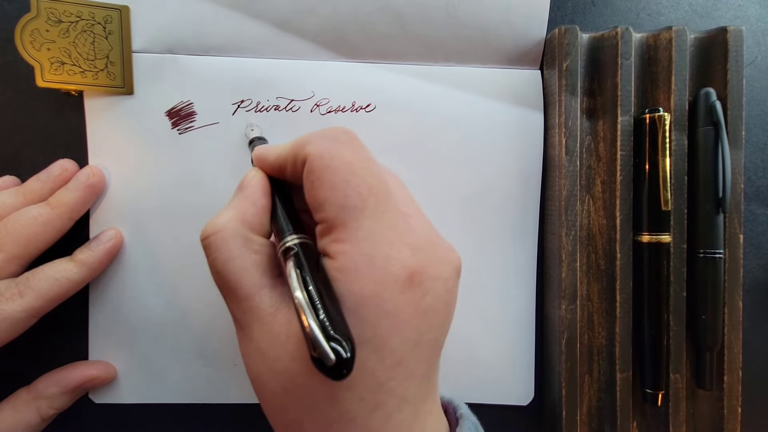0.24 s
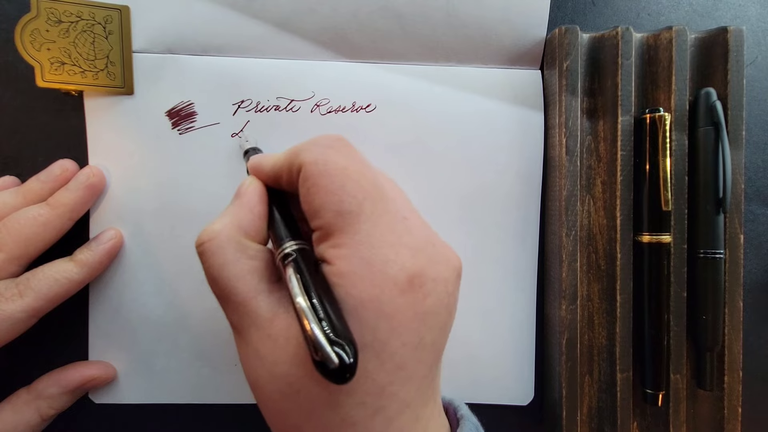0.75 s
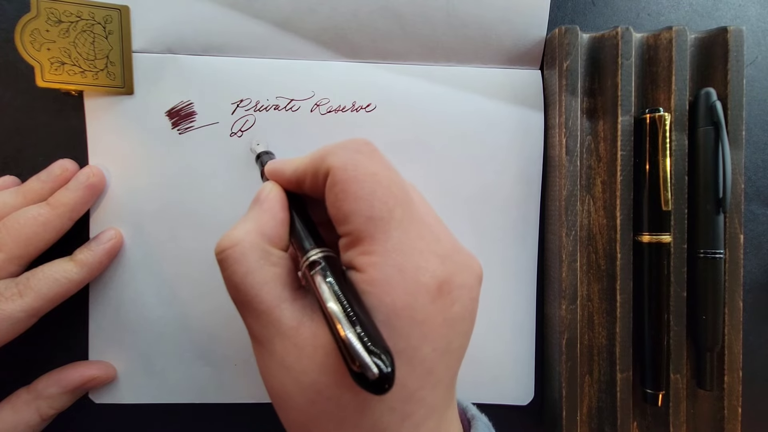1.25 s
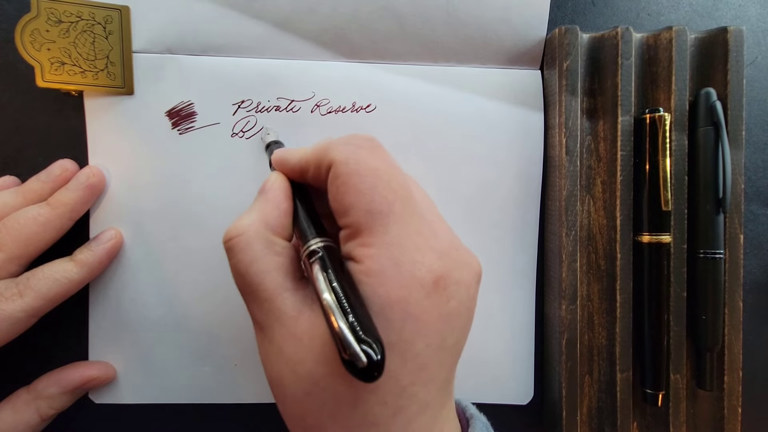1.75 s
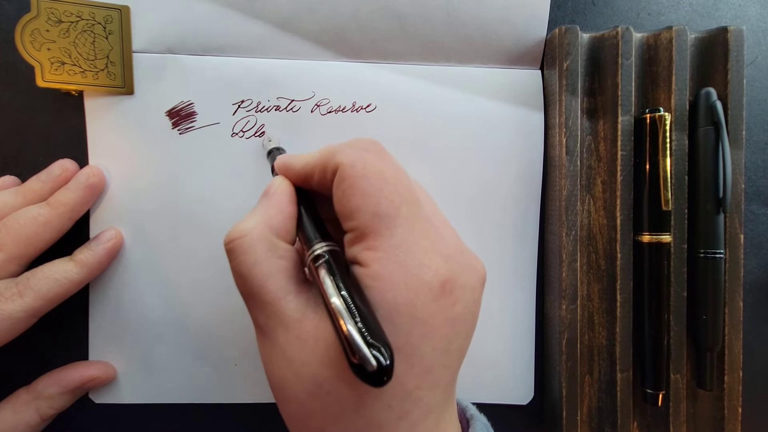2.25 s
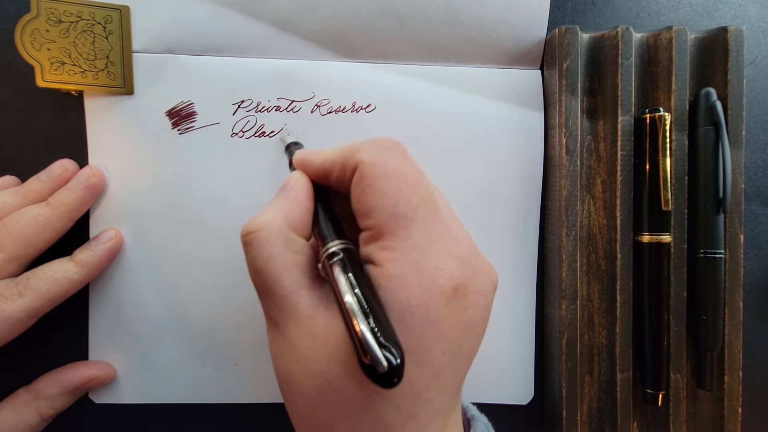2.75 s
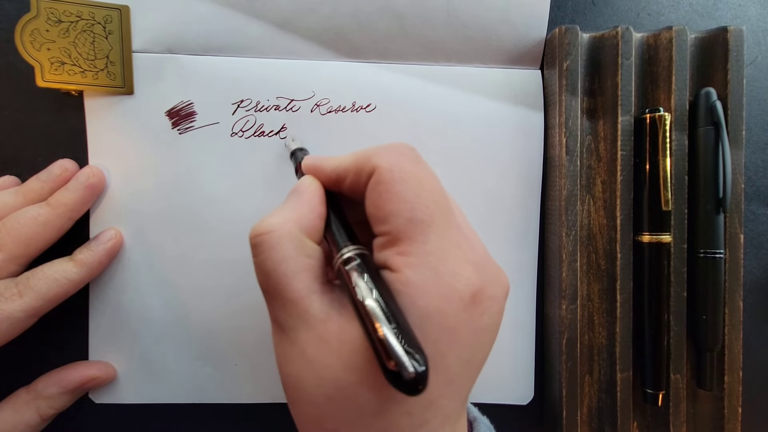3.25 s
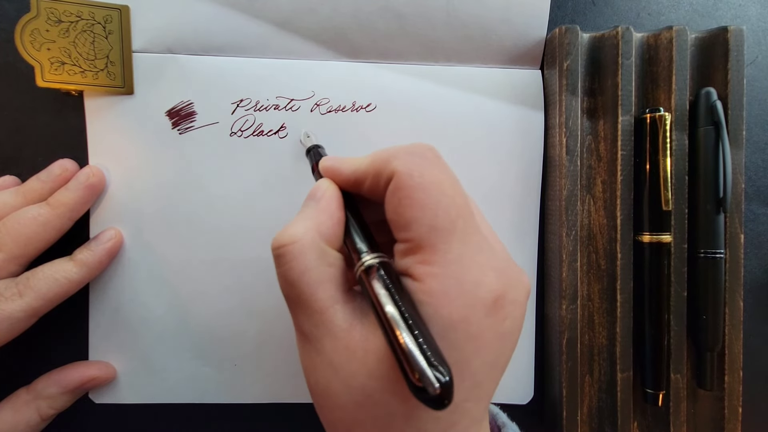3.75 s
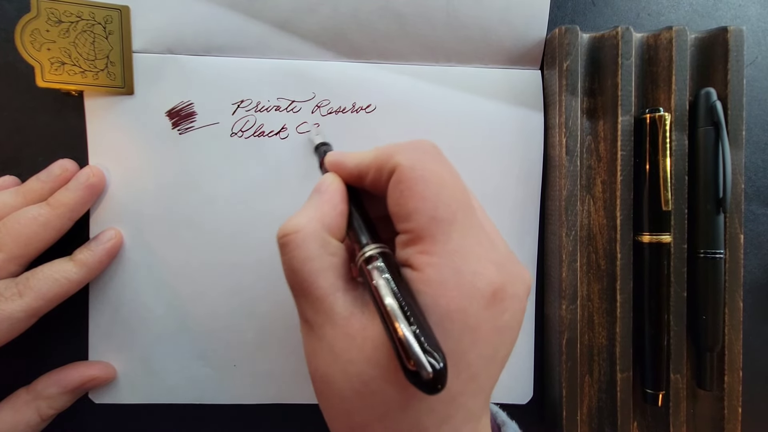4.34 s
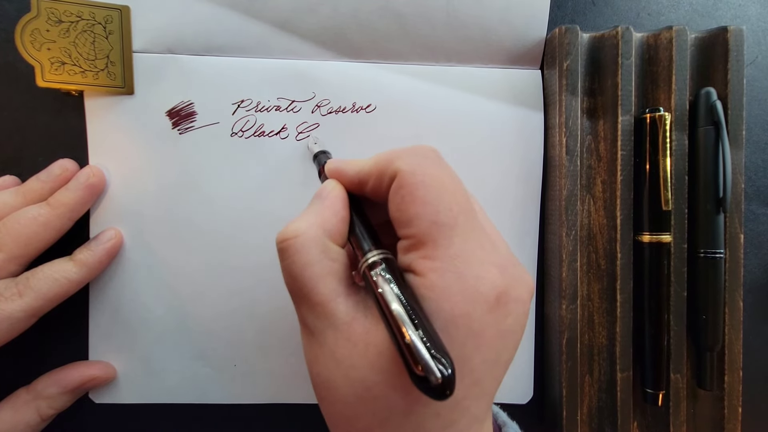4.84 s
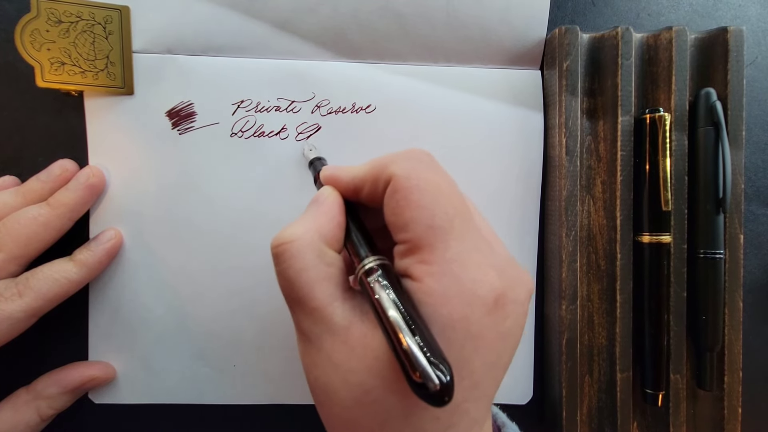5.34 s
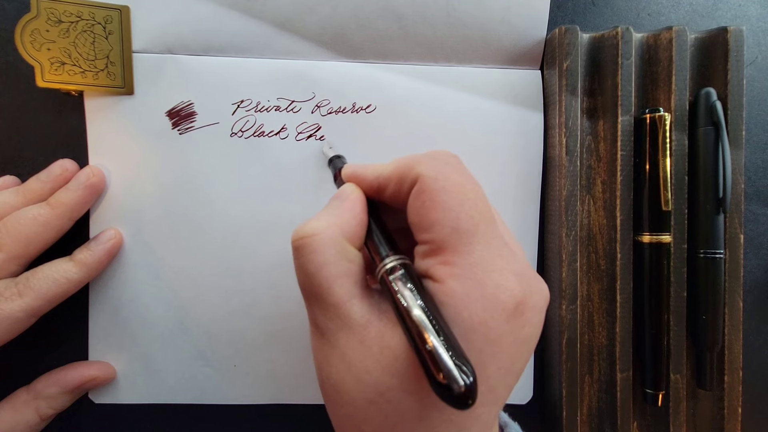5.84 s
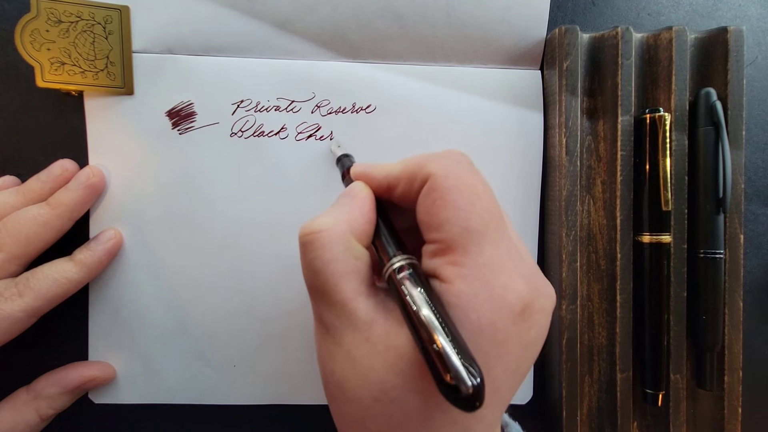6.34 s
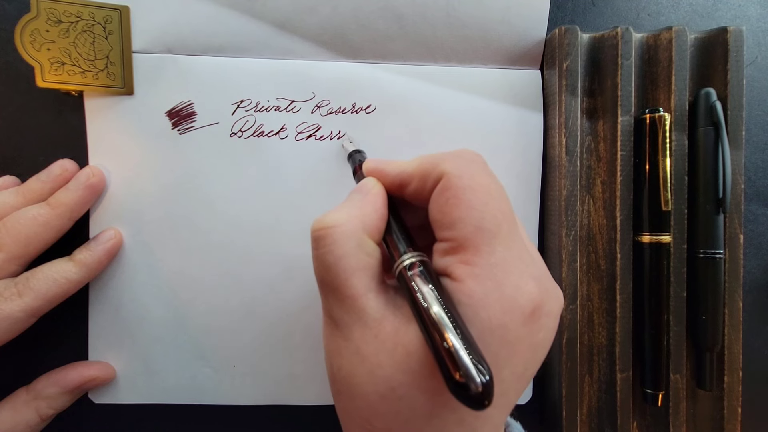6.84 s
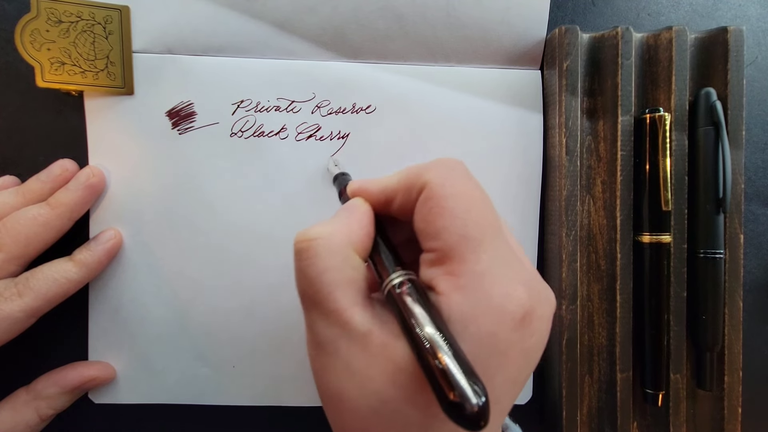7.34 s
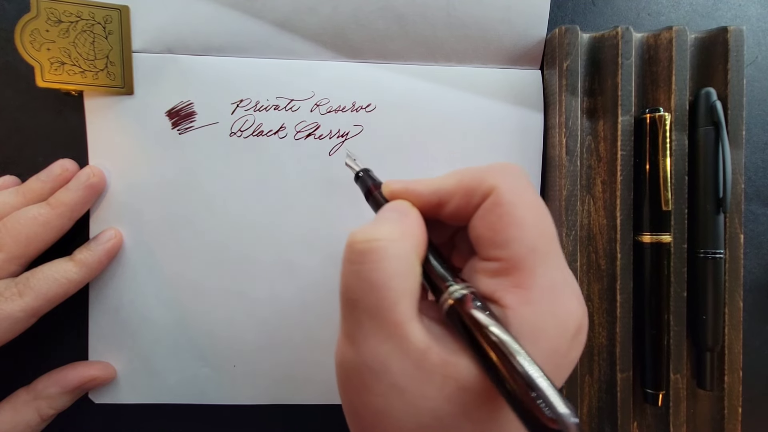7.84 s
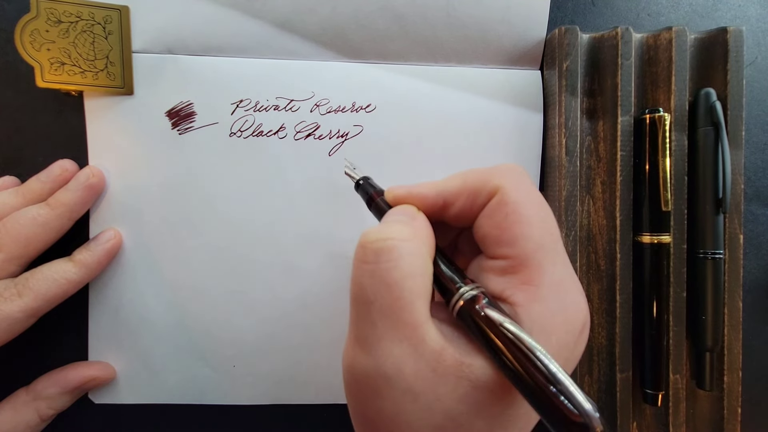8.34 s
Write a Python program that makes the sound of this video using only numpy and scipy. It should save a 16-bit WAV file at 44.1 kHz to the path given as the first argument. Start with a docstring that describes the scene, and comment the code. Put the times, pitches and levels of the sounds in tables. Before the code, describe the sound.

A metal nib scrapes paper in a quiet room, miked closely. Two firm strokes begin, then after a pause a quick chain of small scratches, a papery hand swish, another gap, and a second chain ending in the two strongest strokes. Low rumble and faint air continue throughout, while a deep hum cuts out near the end.

```python
"""Fountain pen in a notebook, close stereo

A fountain pen writes two words in a notebook on a desk in a quiet room. The stereo microphone is close,
and the page sounds louder and brighter on the left. In each stroke the nib plucks paper fibres: the page
rings, the nib rasps, the fibres hiss; now and then it catches. The tip ticks as it touches down, and the
hand slides along between letters. Desk and walls answer with decaying tails of noise.
The room rumbles under faint air noise, and a motor hums until shortly before the last letter."""
import sys
import numpy as np
from scipy import signal
from scipy.fft import rfft, irfft, next_fast_len
from scipy.io import wavfile
from scipy.ndimage import map_coordinates

SR = 44100
rng = np.random.default_rng(int(sys.argv[2]) if len(sys.argv) > 2 else 0)


def to_wav(s):
    """Save 16-bit WAV."""
    ch = np.atleast_2d(s).T  # columns
    pcm = np.round(np.clip(ch, -1, 1) * 32767)  # PCM
    wavfile.write(sys.argv[1], SR, pcm.astype(np.int16))


N = 378818

# Levels in these tables are relative: each source is balanced again in the mix.
# Spectrum of the room's rumble. Each row: frequency in Hz, level in dB.
RUMBLE_SPECTRUM = [(15, -39.5), (24, -8), (32, -8.5), (55, -0.5), (78, 1), (105, -0.5), (140, -10.5),
                   (172, -4.5), (210, -12), (245, -16.5), (265, -22), (310, -22.5), (450, -35.5),
                   (800, -69)]
# Spectrum of the room's air noise. Each row: frequency in Hz, level in dB.
AIR_SPECTRUM = [(200, 0.5), (450, 6), (680, -1), (727, 9), (780, 2.5), (1050, -3), (1350, -1), (1600, -9.5),
                (2300, -16.5), (3200, -17), (6000, -27), (8000, -45), (11000, -24), (15500, -22.5)]
# Partials of the motor hum. Each row: frequency in Hz, level in dB rms before the left-right balance.
HUM_PARTIALS = [(61.15, -47.5), (122.3, -66.5), (243.5, -75)]
# Right microphone against the left for sounds on the page. Each row: frequency in Hz, gain in dB.
RIGHT_MICROPHONE = [(400, 2), (1000, -5.5), (1400, -4.5), (2400, -6), (3400, -5.5), (4300, -7),
                    (5500, -19.5), (8100, -15), (10500, -18.5), (13000, -9.5), (15500, -23.5)]
# The side of the hand slides over the page, creeping in and out a little beyond both times.
# Each row: start in seconds, end in seconds, place of top speed from 0 to 1, level in dB.
HAND_SLIDES = [(.527, 0.854, .4, -70.5), (1.095, 1.389, .51, -66.5), (3.358, 3.634, .77, -56.5),
               (3.743, 3.954, 0.4, -77.5), (4.023, 4.183, .36, -76.5), (6.838, 7.02, 0.5, -73.5),
               (7.713, 8.12, .35, -80.5)]
# Spectrum of skin on paper. Each row: frequency in Hz, level in dB.
SKIN_SPECTRUM = [(300, -23), (1000, 11), (2000, 5), (3300, 8), (5000, 3.5), (6500, 1.5), (7500, 2),
                 (9500, 8.5), (12500, 10), (15500, 7)]
# The nib touches down. Each row: time in seconds, level in dB.
TOUCHDOWNS = [(0.337, -71), (1.631, -77), (4.065, -65)]
# Spectrum of the tick of the nib. Each row: frequency in Hz, level in dB.
TICK_SPECTRUM = [(800, -16), (1700, -8), (2250, 24), (3000, -18), (4200, 4), (7500, -12), (9400, 20),
                 (10800, 1), (12000, 7), (15500, -7)]
# Pen strokes, each one bell of speed that creeps in and out a little beyond its length.
# Each row: middle in seconds, length in seconds, ring of the page in dB, rasp of the nib in dB.
PEN_STROKES = [(0.481, .17, -52.5, -51.5), (.68, 0.55, -71.5, -76), (0.946, 0.18, -54, -57),
               (1.055, .17, -49.5, -49), (1.823, 0.19, -53, -57), (1.97, 0.17, -52, -58),
               (2.106, 0.15, -59.5, -66.5), (2.231, .15, -61, -70.5), (2.337, 0.14, -60, -70),
               (2.432, 0.12, -64.5, -77.5), (2.535, .13, -56, -63.5), (2.654, 0.21, -67, -73.5),
               (2.785, 0.18, -53, -59), (2.911, .15, -50, -60), (3.051, 0.13, -54.5, -64),
               (3.141, .115, -54.5, -63), (3.277, 0.15, -61, -70), (3.329, 0.093, -58, -65.5),
               (4.212, 0.19, -57, -62), (4.353, .19, -50.5, -56), (4.512, 0.21, -53, -52.5),
               (4.642, .17, -54.5, -61), (5.273, 0.15, -56.5, -68), (5.419, .2, -53.5, -59),
               (5.567, 0.13, -56, -65), (5.671, .095, -56.5, -73.5), (5.784, .15, -62, -71),
               (5.879, 0.12, -60.5, -72.5), (5.998, .19, -56.5, -67.5), (6.333, 0.21, -62.5, -78.5),
               (6.495, 0.15, -57, -66.5), (6.751, 0.19, -60.5, -78.5), (6.917, 0.18, -65, -80),
               (7.126, .115, -54, -74), (7.239, .13, -58, -71), (7.423, 0.2, -47, -51.5),
               (7.584, .21, -47.5, -52.5), (7.686, 0.12, -61.5, -59.5)]
# The nib catches hard and judders. Each row: time in seconds, level in dB.
NIB_CATCHES = [(.44, -60), (.724, -64), (1.028, -59.5), (2.424, -53), (2.659, -54.5), (2.935, -53.5),
               (3.258, -57), (4.559, -51.5), (5.368, -54.5), (5.455, -51), (6.32, -57), (7.335, -56),
               (7.367, -47.5)]
# Brightness of the nib at a usual stroke as the hand moves on. Each row: time in seconds, tilt in dB per octave.
USUAL_TILT = [(2.3, -7.5), (3.2, 5), (7.5, 0)]
# Resonances of the page on the desk. Each row: frequency in Hz, width in Hz, level in dB.
PAGE_RESONANCES = [(583, 70, -27), (750, 67, -5.5), (818, 42, -7.5), (975, 109, 6.5), (1247, 75, 5.5),
                   (1374, 110, 5.5), (1739, 41, -7.5)]
# Resonances of nib and barrel. Each row: frequency in Hz, width in Hz, level in dB.
NIB_RESONANCES = [(2174, 220, -1.5), (2447, 130, -0.5), (2958, 390, 0), (3377, 390, 1), (3930, 580, -5),
                  (4760, 450, -8.5)]
# Spectrum of the fibres at the start of the line. Each row: frequency in Hz, level in dB.
FIBRES_AT_START = [(3500, -20.5), (4700, -9), (5300, -3.5), (5900, -8), (6500, -8), (6900, 4), (7500, -4.5),
                   (8400, -7.5), (8950, 4.5), (10300, -4), (11100, -10.5), (12700, -6.5), (15500, -17)]
# Spectrum of the fibres at the end of the line. Each row: frequency in Hz, level in dB.
FIBRES_AT_LINE_END = [(3500, -15.5), (4800, -4), (5400, -6), (5900, -4), (6500, -8.5), (7150, -0.5),
                      (7900, -5.5), (9000, 1), (10200, 6), (11300, -4), (12700, -1.5), (14000, 0.5),
                      (15500, -6)]

STROKE_TOP = .49  # place of top speed, as a share of the stroke
HISS_DB, HISS_DB_PER_S = -3, 0.2742  # fibre hiss against rasp at time 0, and its slow gain along the line
TILT_PER_DB, USUAL_RASP_DB = 0.44, -63  # a harder stroke is brighter: dB per octave for each dB above usual
HUM_STOP_S, LINE_END_S = 6.97, 7.7
TOP_HZ = 15750
SIZE = next_fast_len(N + SR // 2, True)
FREQS = np.maximum(np.arange(SIZE // 2 + 1) * SR / SIZE, 1)
TIME = np.arange(N) / SR


def undb(db):
    """Decibels to gain."""
    return 10 ** (np.asarray(db) / 20)


def unit(x):
    """Scale to rms 1."""
    return x / np.sqrt(np.mean(x ** 2))


def filtered(x, response):
    """Apply a frequency response."""
    return irfft(rfft(x, SIZE) * response, SIZE)[..., :N]


def colour(points):
    """Causal (minimum-phase) response through (Hz, dB) points, made by folding the cepstrum."""
    hz, db = np.transpose(points)
    level_db = np.interp(np.log(FREQS), np.log(hz), db)
    cepstrum = irfft(np.log(undb(level_db)), SIZE)
    cepstrum[1:SIZE // 2] *= 2
    cepstrum[SIZE // 2 + 1:] = 0
    return np.exp(rfft(cepstrum))


def unevenness(per_s, db):
    """A gain that wanders at random between knots."""
    knots = np.arange(0, TIME[-1] + 1, 1 / per_s)
    return undb(db * np.interp(TIME, knots, rng.standard_normal(len(knots))))


def balance(left_db):
    """Gains of the two microphones, the left one louder than the right by left_db."""
    return undb(np.array([[left_db], [-left_db]]) / 2)


def glide(start, end, top, width=0.62, sharpness=3.5):
    """Sample numbers and speed (0-1) of one movement: a bell that creeps in and out half a span beyond."""
    top = np.clip(top, .1, .9)
    span = end - start
    first = max(int((start - span / 2) * SR), 0)
    last = min(int((end + span / 2) * SR), N)
    at = np.arange(first, last)
    from_top = (TIME[at] - start) / span - top
    way = np.abs(from_top) / np.where(from_top < 0, top, 1 - top)
    return at, 1 / (1 + (way / width) ** sharpness)


def room_noise(points, db, apart_hz, left_db, swell_db):
    """Diffuse noise that swells a little: long waves reach both microphones alike, short ones do not."""
    mid, side = rng.standard_normal((2, N))
    side = filtered(side, 1 / np.hypot(1, apart_hz / FREQS))
    pair = unit(filtered(np.array([mid + side, mid - side]), colour(points)))
    return pair * unevenness(per_s=3, db=swell_db) * undb(db) * balance(left_db)


def motor(waver=0.04, stop_s=0.11, left_db=1.0):
    """A low hum of steady sines whose strengths waver a little, and which cuts out."""
    knots = np.arange(0, TIME[-1] + 1, 1 / 4)
    hum = 0
    for hz, db in HUM_PARTIALS:
        sway = 1 + waver * np.interp(TIME, knots, rng.standard_normal(len(knots)))
        sine = np.sin(2 * np.pi * (hz * TIME + rng.random()))
        hum = hum + np.sqrt(2) * undb(db) * sway * sine
    running = np.clip((HUM_STOP_S - TIME) / stop_s + .5, 0, 1)
    return hum * running * balance(left_db)


def reflections(x, t60_s, db):
    """A diffuse decaying tail, different at each microphone, that begins 2 ms after the sound."""
    age = TIME[:SR // 2]
    tail = rng.standard_normal((2, len(age))) * undb(-60 * age / t60_s) * (age > .002)
    tail /= np.sqrt(np.sum(tail ** 2, axis=1, keepdims=True))
    return undb(db) * signal.fftconvolve(x, tail, axes=1)[:, :N]


def hand(dull_power=0.78, bright_power=2.23, split_hz=2600):
    """Skin brushes a broad patch of paper: a smooth swish that brightens with speed."""
    swish = unit(filtered(rng.standard_normal((2, N)), colour(SKIN_SPECTRUM)))
    dull = filtered(swish, 1 / (1 + (FREQS / split_hz) ** 4))
    bright = swish - dull
    out = np.zeros((2, N))
    for start, end, top, db in HAND_SLIDES:
        at, speed = glide(start, end, top)
        brushed = speed ** dull_power * dull[:, at] + speed ** bright_power * bright[:, at]
        out[:, at] += undb(db) * brushed
    return out


def touches(fall_60db_s=0.012):
    """The metal tip lands with one tiny blow and rings briefly, alike at both microphones."""
    ring = irfft(colour(TICK_SPECTRUM), SIZE)[:SR // 50]
    ring = unit(ring * undb(-60 * TIME[:len(ring)] / fall_60db_s))
    out = np.zeros(N)
    for s, db in TOUCHDOWNS:
        out[int(s * SR) + np.arange(len(ring))] += undb(db) * ring
    return out


def plucks(per_s, spread_db, scatter):
    """Fibres snapping past a rubbing tip: dense clicks of unequal size, thrown unevenly to left and right."""
    at = np.flatnonzero(rng.random(N) < per_s / SR)
    size, common, left, right = rng.standard_normal((len(at), 4)).T
    clicks = np.zeros((2, N))
    clicks[:, at] = undb(spread_db * size) * (np.sign(common) + scatter * np.array([left, right]))
    return clicks


def resonances(modes, low_hz, high_hz):
    """Response of modes of alternating sign that radiate mainly between two edges."""
    ring = 0
    for k, (hz, width, db) in enumerate(modes):
        ring = ring + (-1) ** k * undb(db) / (1 + 1j * (FREQS ** 2 - hz ** 2) / (FREQS * width))
    return ring / np.sqrt((1 + (low_hz / FREQS) ** 8) * (1 + (FREQS / high_hz) ** 12))


def drift(x, rise):
    """Resonances climb slowly as the pen moves along the line, by reading the sound ever faster."""
    place = np.cumsum(1 + rise * (TIME / LINE_END_S - .5))
    return np.array([map_coordinates(side, [place], order=3, mode="wrap") for side in x])


def tilted(x, db_per_octave):
    """The nib sounds duller or brighter from stroke to stroke: a slope from 1900 to 3600 Hz."""
    size = next_fast_len(x.shape[1], True)
    octaves = np.log2(np.clip(np.arange(size // 2 + 1) * SR / size, 1900, 3600))
    return irfft(rfft(x, size) * undb(db_per_octave * octaves), size)[:, :x.shape[1]]


def hand_echo(x, share, lag_s, count=3):
    """Fingers and page throw early echoes to each microphone; lags, .1 to 1.1 of lag_s, change each stroke."""
    out = x.copy()
    for side in range(2):
        lags = (SR * lag_s * (.1 + rng.random(count))).astype(int) + 1
        for lag in lags:
            out[side, lag:] += share * rng.choice([-1, 1]) * x[side, :-lag]
    return out / np.sqrt(1 + count * share ** 2)


def page_ring(rough):
    """Plucked fibres ring the page on the desk."""
    snaps = rough * plucks(per_s=1600, spread_db=3.5, scatter=0.24)
    return unit(filtered(snaps, resonances(PAGE_RESONANCES, low_hz=515, high_hz=2020)))


def nib_rasp(rough):
    """Plucked fibres ring nib and barrel, whose resonances climb along the line."""
    snaps = rough * plucks(per_s=2400, spread_db=0.5, scatter=0.96)
    nib = filtered(snaps, resonances(NIB_RESONANCES, low_hz=1530, high_hz=5800))
    return unit(drift(nib, rise=.06))


def fibre_hiss(rough):
    """Fibres snap densely; the hiss takes another path past the fingers as the hand travels right."""
    snaps = rough * plucks(per_s=8000, spread_db=1, scatter=0.63)
    along = np.clip(TIME / LINE_END_S, 0, 1)
    at_start = filtered(snaps, colour(FIBRES_AT_START))
    at_end = filtered(snaps, colour(FIBRES_AT_LINE_END))
    return (1 - along) * at_start + along * at_end


def catches(page, nib, nib_db=-15):
    """A caught nib judders for about 30 ms, mostly shaking the page."""
    out = np.zeros((2, N))
    for s, db in NIB_CATCHES:
        at, slip = glide(s - .012, s + .018, top=.4)
        judder = unit(slip * (page[:, at] + undb(nib_db) * nib[:, at]))
        out[:, at] += undb(db) * judder / 2
    return out


def pen(page_power=2.06, nib_power=2.73, hiss_power=2.48):
    """Plucked fibres ring page and nib; the treble needs more speed, so strokes begin and end dull."""
    # the paper has more tooth in some spots than in others
    rough = unevenness(per_s=160, db=1.45)
    page, nib, hiss = page_ring(rough), nib_rasp(rough), fibre_hiss(rough)
    # the nib grips and slips a little all along a stroke, which shakes the page unevenly
    grip = unevenness(per_s=55, db=1.2)
    out = np.zeros((2, N))
    for middle, length, page_db, rasp_db in PEN_STROKES:
        at, speed = glide(middle - length / 2, middle + length / 2, STROKE_TOP)
        tilt = np.interp(middle, *np.transpose(USUAL_TILT)) + TILT_PER_DB * (rasp_db - USUAL_RASP_DB)
        rasp = speed ** nib_power * unit(tilted(nib[:, at], tilt))
        hiss_db = HISS_DB + HISS_DB_PER_S * middle
        rasp += undb(hiss_db) * speed ** hiss_power * unit(hiss[:, at])
        out[:, at] += undb(page_db) * speed ** page_power * unit(grip[at] * page[:, at])
        out[:, at] += undb(rasp_db) * hand_echo(rasp, share=0.39, lag_s=.002)
    return out + catches(page, nib)


def scene():
    """Pen and hand lie nearer the left microphone; desk and walls answer, over the room's own noise."""
    rumble = room_noise(RUMBLE_SPECTRUM, db=-50.0, apart_hz=496, left_db=1.25, swell_db=1.24)
    air = room_noise(AIR_SPECTRUM, db=-75.0, apart_hz=600, left_db=2.0, swell_db=0.5)
    direct = undb(-1.5) * hand() + undb(-5.0) * touches() + undb(-0.57) * pen()
    desk = reflections(direct, t60_s=0.045, db=-7)
    walls = reflections(direct, t60_s=0.49, db=-20)
    near = direct + desk + walls
    near[1] = filtered(near[1], colour(RIGHT_MICROPHONE))
    return rumble + air + motor() + near


def record(dry):
    """The recorder cuts the top steeply."""
    steep_cut = signal.ellip(10, .1, 70, TOP_HZ, fs=SR, output="sos")
    return signal.sosfilt(steep_cut, dry)


dry = scene()
out = record(dry)
to_wav(out)
```